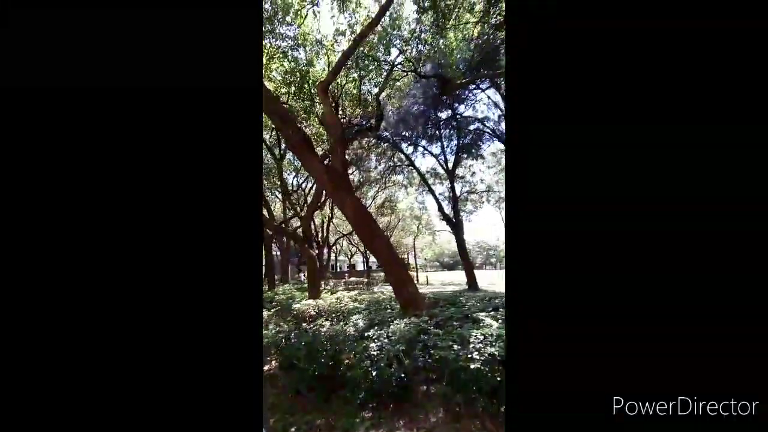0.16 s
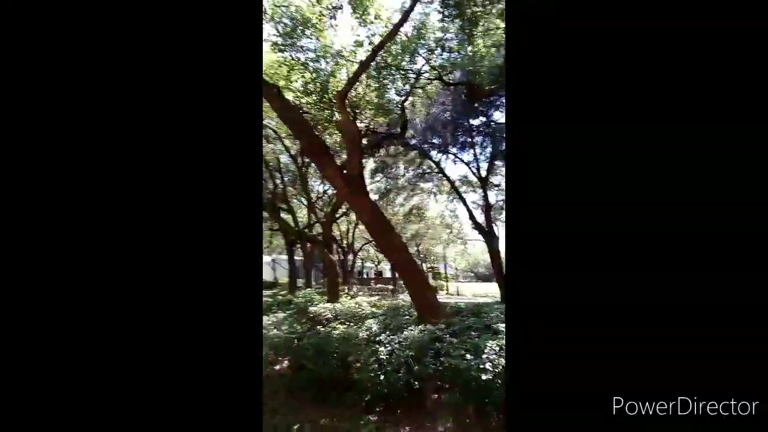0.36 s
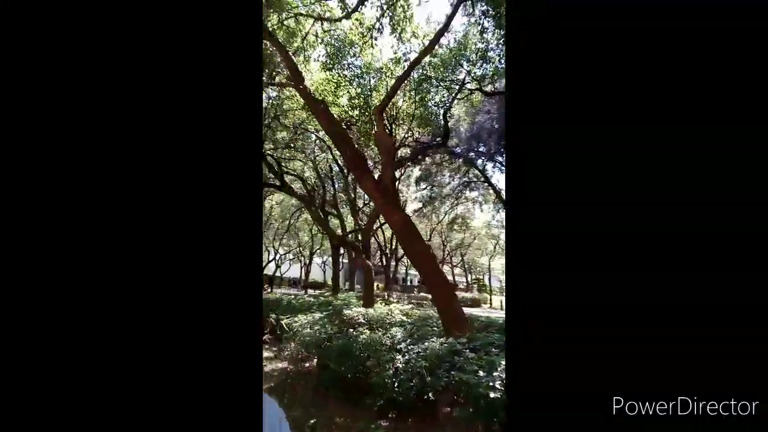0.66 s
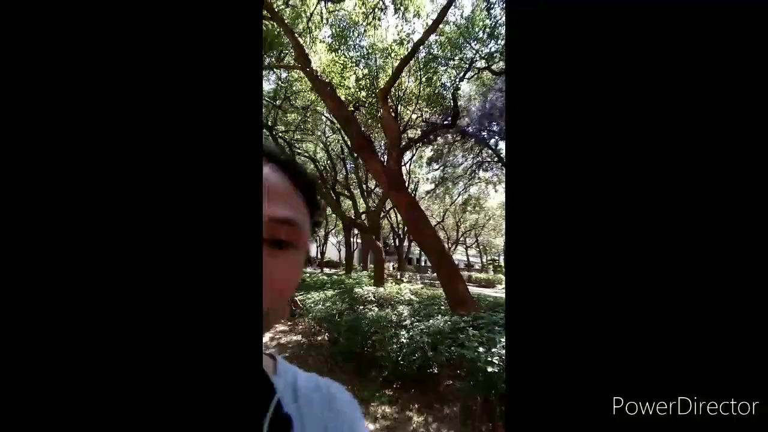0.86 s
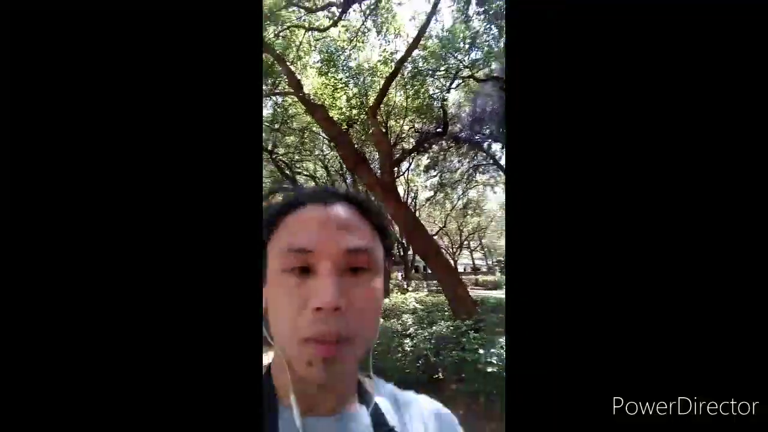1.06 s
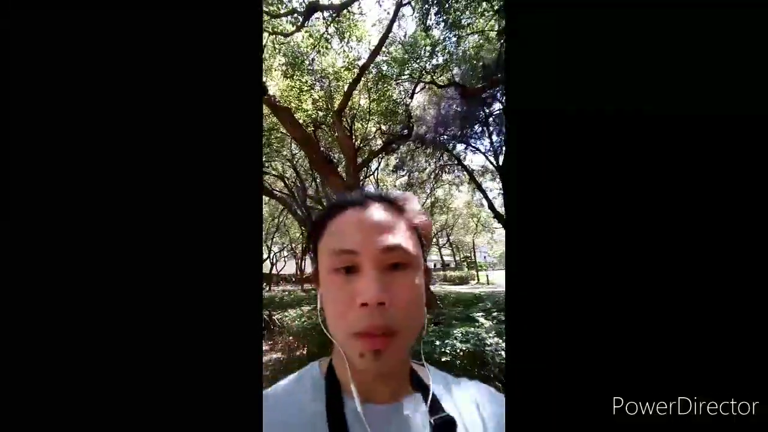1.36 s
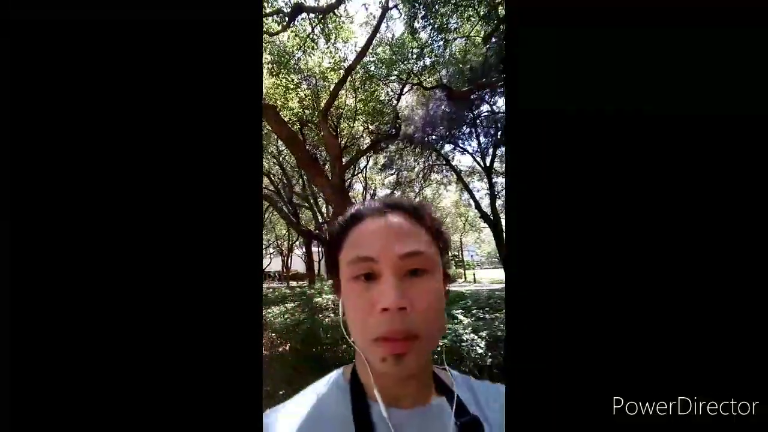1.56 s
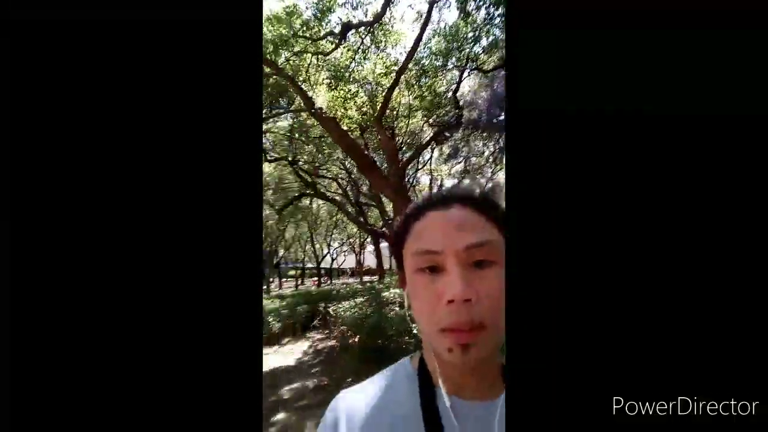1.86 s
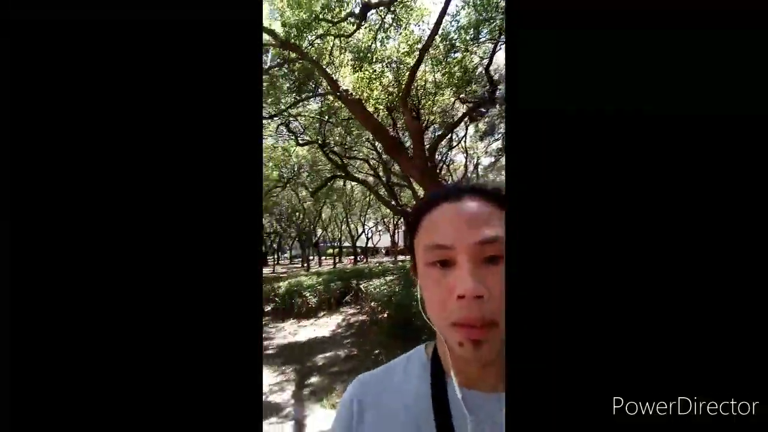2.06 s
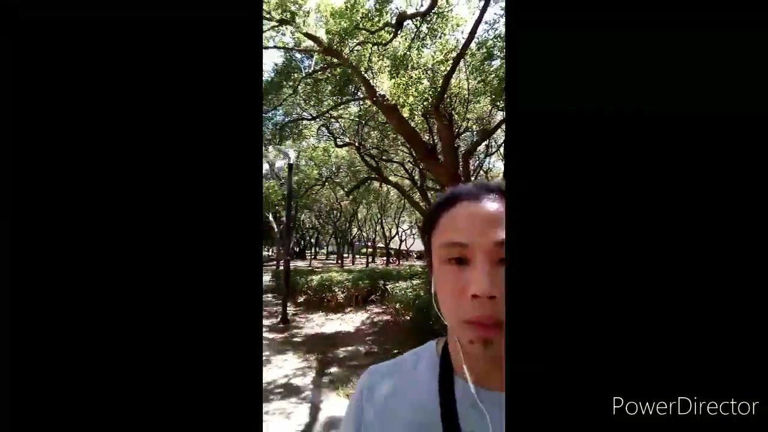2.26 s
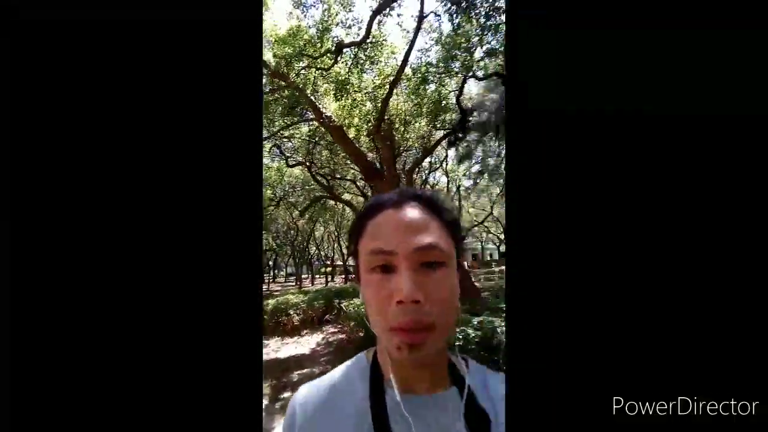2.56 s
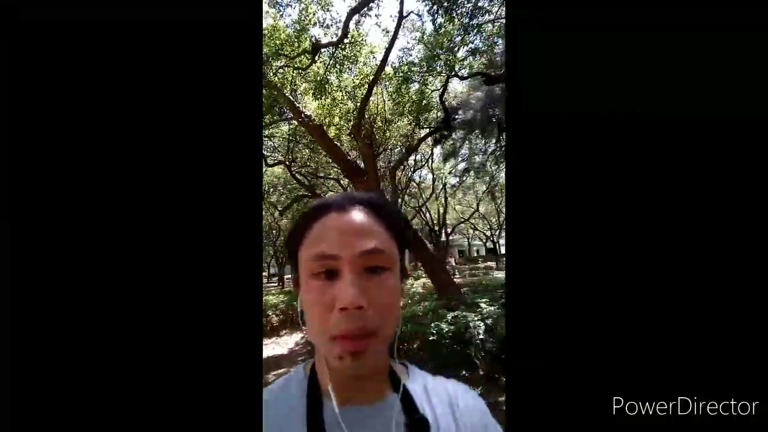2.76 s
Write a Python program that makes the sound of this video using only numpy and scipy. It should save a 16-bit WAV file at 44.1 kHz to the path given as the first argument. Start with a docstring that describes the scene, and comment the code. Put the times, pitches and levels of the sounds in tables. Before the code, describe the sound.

Cicadas drone with a high, whining sizzle among trees, growing louder around a hand-held microphone. Past the middle come a few quick, raspy bird squeaks and a soft handling bump, over faint town rumble.

```python
"""A grove, with one hand-held microphone among a chorus of cicadas. Their tymbal clicks merge into
a sizzle that swells as the microphone turns; narrow whines stand out of it and creep upward.
About two seconds in, a brief run of falling squeaks, probably a bird, echoes among the trees.
Underneath lie a distant town, a soft hiss of leaves, a faint mains hum and light handling noises."""
import sys
import numpy as np
from scipy import signal
from scipy.fft import rfft, irfft, next_fast_len
from scipy.io import wavfile
from scipy.ndimage import map_coordinates

SR = 44100
rng = np.random.default_rng(int(sys.argv[2]) if len(sys.argv) > 2 else 0)


def wav_out(sig):
    """Save sig, one row per channel (or a flat mono array), as 16-bit PCM at SR to the path in sys.argv[1]."""
    wavfile.write(sys.argv[1], SR, np.round(np.clip(np.atleast_2d(sig).T, -1, 1) * 32767).astype(np.int16))


N = 127890


def amp(db):
    """Decibels to gain."""
    return 10 ** (np.asarray(db) / 20)


def unit(x):
    """Scale to rms 1."""
    return x / np.sqrt(np.mean(x ** 2) + 1e-20)


def along(points, hz):
    """Interpolate (Hz, value) points on a log frequency axis."""
    point_hz, values = np.transpose(points)
    return np.interp(np.log(hz + 1), np.log(point_hz + 1), values)


def curve(rows):
    """(seconds, value) rows as one value per sample."""
    return np.interp(np.arange(N) / SR, *np.transpose(rows))


def wobble(rate):
    """A smooth random curve, rate knots a second."""
    knots = rng.standard_normal(int(N * rate / SR) + 4)
    return map_coordinates(knots, [np.arange(N) * rate / SR])


def filtered(x, response):
    """Filter x by a gain given as a function of Hz."""
    size = next_fast_len(N + SR // 2)
    return irfft(rfft(x, size) * response(np.fft.rfftfreq(size, 1 / SR)), size)[..., :N]


def coloured(x, spectrum):
    """x shaped by (Hz, dB) points, at rms 1."""
    return unit(filtered(x, lambda hz: amp(along(spectrum, hz))))


def arch(start, length):
    """A rounded swell from 0 to 1 and back, and the progress through it."""
    progress = np.clip((np.arange(N) / SR - start) / length, 0, 1)
    return np.sin(np.pi * progress), progress


def tone(hz):
    """A sine that follows a pitch curve."""
    return np.sin(2 * np.pi * np.cumsum(hz) / SR)


def grove(x):
    """Ever-changing scatter from trunks and swaying leaves: the echo, and its overhang past the end."""
    # The high treble dies first. Each row: frequency in Hz, seconds to fall 60 dB.
    ring_time = [(500, 0.35), (2500, 0.56), (7000, 0.39), (14000, 0.18)]
    out, piece = np.zeros(N + SR), SR // 16
    for at in range(0, N, piece):  # a fresh tail for each piece
        hz, t, noise = signal.stft(rng.standard_normal(SR // 3), SR, nperseg=256)
        decay = amp(-60 * t / along(ring_time, hz)[:, None])
        tail = signal.istft(noise * decay, SR, nperseg=256)[1]
        echo = signal.fftconvolve(x[at:at + piece], tail / np.linalg.norm(tail))
        out[at:at + len(echo)] += echo
    return out[:N], out[N:]


def tymbals(body, insects, clicks_per_s=430, wander=.015, jitter_s=.00016):
    """Each insect clicks at its own wandering rate; the trees scatter it, the resonance colours it."""
    clicks = np.zeros(N)
    for _ in range(insects):
        rate = clicks_per_s * np.exp(.2 * rng.standard_normal() + wander * wobble(12))
        cycles = np.cumsum(rate) / SR + rng.random()
        at = np.flatnonzero(np.diff(np.floor(cycles)))
        timing, strength = rng.standard_normal((2, N))[:, at]
        at = np.round(at + jitter_s * SR * timing).astype(int) % N
        clicks += np.bincount(at, amp(2 * strength), N)
    clicks = filtered(clicks, lambda hz: hz > 2800)
    echo, overhang = grove(clicks)
    already_ringing = np.pad(overhang, (0, N - SR))  # the grove is sounding from the start
    return coloured(0.51 * clicks + echo + already_ringing, body)


def whines(partials, flutter_rate, rough):
    """Narrow partials that glide up together, each fluttering in strength and phase."""
    # Each row: time in seconds, share of full pitch.
    glide = [(0, .986), (.8, .987), (1.5, .993), (2.1, .999), (2.9, 1.001)]
    phase_per_hz = 2 * np.pi * np.cumsum(curve(glide)) / SR
    out = np.zeros(N)
    for hz, db in partials:
        drift = np.exp(2j * wobble(7))
        flutter = rough * (wobble(flutter_rate) + 1j * wobble(flutter_rate))
        out += amp(db) * unit(np.real((drift + flutter) * np.exp(1j * hz * phase_per_hz)))
    return out


def cicadas():
    """Three registers of tymbal sizzle, the lower two with whines, over faint deep callers that fade."""
    # Tymbal resonances of each group. Each row: frequency in Hz, relative level in dB.
    deep_body = [(3300, -22), (3950, -2.5), (4350, -2), (4600, 2), (5000, -19)]
    low_body = [(2800, -66), (3600, -22.5), (4250, -11), (4600, -5), (5000, 0.5), (5600, 2), (5900, -1),
                (6600, -40)]
    main_body = [(4800, -50), (5700, -10.5), (6200, -2.5), (6850, 0.5), (7550, -1), (7900, -2.5),
                 (8250, -7.5), (9000, -10.5), (10000, -14), (13000, -33)]
    near_body = [(5200, -38.5), (6200, -6), (6900, -4), (7400, -0.5), (7800, -3), (8300, -10.5),
                 (9500, -21), (12000, -40)]
    high_body = [(7500, -26), (8700, -5), (9500, -5), (10100, 0), (10800, 1.5), (11300, -0.5),
                 (11800, -5.5), (12400, -11.5), (13500, -16.5), (15400, -23)]
    # Whining partials. Each row: full pitch in Hz, relative level in dB.
    low_whines = [(4432, -14), (4625, -20), (4755, -14), (4802, -10), (4915, -17), (5112, -13), (5343, -7),
                  (5520, -11)]
    main_whines = [(6003, -13.5), (6208, -16), (6442, -10.5), (6665, -19), (6945, -15), (7112, -17),
                   (7357, -15), (7705, -20), (7905, -21), (8522, -22), (8882, -20)]
    # Loudness at the microphone. Each row: time in seconds, gain in dB.
    deep_level = [(0, -55), (.5, -49), (.95, -49.5), (1.3, -59), (2.9, -66)]
    low_level = [(0, -39.6), (.52, -38.1), (.9, -38.8), (1.06, -40.6), (1.36, -40.6), (1.52, -38.6),
                 (1.86, -38.1), (2.16, -35.6), (2.46, -34.6), (2.68, -36.2), (2.77, -34.2), (2.9, -36)]
    main_level = [(0.02, -33), (0.3, -34), (0.31, -32.5), (1.29, -32), (1.52, -29.5), (1.67, -30.5),
                  (2.13, -26.5), (2.19, -29), (2.21, -26), (2.29, -27), (2.39, -25), (2.42, -27.5),
                  (2.61, -25), (2.62, -30), (2.65, -26), (2.87, -27)]
    high_level = [(0.02, -38), (0.25, -38), (0.26, -40), (0.59, -38), (0.62, -41), (0.65, -40),
                  (1.88, -32.5), (1.88, -34), (2.25, -37), (2.87, -36)]
    # The nearest insects come forward. Each row: time in seconds, share of the main sizzle's power.
    near_share = [(0, .05), (1.2, 0.12), (2.1, 0.52), (2.9, 0.56)]

    near = curve(near_share)
    sizzle = np.sqrt(1 - near) * tymbals(main_body, insects=8)
    sizzle += np.sqrt(near) * tymbals(near_body, insects=4)
    low = amp(-1.5) * tymbals(low_body, insects=6)
    low += amp(-1.46) * whines(low_whines, flutter_rate=45, rough=0.97)
    main = amp(-0.63) * sizzle + amp(-1.8) * whines(main_whines, flutter_rate=70, rough=1.1)
    high = amp(0.65) * tymbals(high_body, insects=8)
    return (low * amp(curve(low_level) + 0.19 * wobble(24.88))
            + main * amp(curve(main_level) + 0.18 * wobble(36.06))
            + tymbals(deep_body, insects=3) * amp(curve(deep_level))
            + high * amp(curve(high_level) + 0.15 * wobble(24)))


def town(db=-45):
    """The rumble of a distant town, swaying slightly in level."""
    # Each row: frequency in Hz, relative level in dB.
    rumble = [(13, -40), (22, -5), (40, -7), (120, 0), (200, -2), (280, -4), (400, -7), (520, -5.5),
              (700, -8), (1000, -12), (1450, -14.5), (2400, -17.5), (3300, -26), (4300, -33)]
    return amp(db + .6 * wobble(8)) * coloured(rng.standard_normal(N), rumble)


def leaves():
    """A soft hiss of leaves, mostly 1-4 kHz, that dies away."""
    # Each row: frequency in Hz, relative level in dB.
    hiss = [(500, -16), (1200, -2), (2500, 1), (4000, 4.5), (7000, -25)]
    # Each row: time in seconds, level in dB.
    level = [(0, -56), (.3, -48.5), (.8, -54), (1.3, -55), (2.9, -86)]
    return amp(curve(level) + wobble(13)) * coloured(rng.standard_normal(N), hiss)


def mains_hum(hz=117, db=-60.5):
    """One faint low tone with a wavering phase."""
    phase = 2 * np.pi * hz * np.arange(N) / SR + 0.64 * wobble(6)
    return amp(db) * unit(np.sin(phase))


def scuffs(spread_octaves=0.13):
    """Light rubs of handling at the microphone, each a puff of noise about one pitch."""
    # Each row: start in seconds, length in seconds, centre in Hz, level in dB.
    rubs = [(.235, .08, 1100, -53), (.865, .035, 3800, -48), (.908, .014, 15000, -48)]
    out = np.zeros(N)
    for start, length, centre, db in rubs:
        band = lambda hz: np.exp(-.5 * (np.log2((hz + 1) / centre) / spread_octaves) ** 2)
        out += amp(db) * arch(start, length)[0] * unit(filtered(rng.standard_normal(N), band))
    return out


def bird(rasp_db=-15, rasp_stretch=1.6, echo_db=-8):
    """Quick raspy slurs that drop and level off, with a thin whistle, answered by the grove."""
    # Each row: start in seconds, length in seconds, first and last pitch in Hz, level in dB.
    squeaks = [(1.85, .009, 1800, 1690, -44), (1.867, 0.0059, 1760, 1670, -38),
               (1.871, 0.0181, 3100, 2124, -33), (1.902, 0.01, 2524, 2196, -36.5),
               (1.913, 0.012, 1937, 1830, -36.5), (1.926, 0.011, 3050, 2770, -38),
               (1.929, 0.0102, 2005, 1630, -31.5), (1.997, .008, 1850, 1670, -40.5),
               (2.007, 0.014, 1800, 1750, -44)]
    # Each row: start in seconds, length in seconds, pitch in Hz, level in dB.
    whistles = [(1.912, .036, 3800, -38), (1.94, .12, 3830, -48)]
    # Colour of the rasp. Each row: frequency in Hz, relative level in dB.
    rasp_body = [(900, -30), (1600, -8), (2400, -2), (3200, 6), (4200, -12), (6000, -40)]
    call = np.zeros(N)
    rasp = amp(rasp_db) * coloured(rng.standard_normal(N), rasp_body)
    for start, length, start_hz, end_hz, db in squeaks:
        swell, progress = arch(start, length)
        pitch = end_hz + (start_hz - end_hz) * (1 - progress) ** 2.2
        slur = swell * tone(pitch * (1 + 0.0245 * wobble(900)))
        call += amp(db) * (slur + arch(start, rasp_stretch * length)[0] * rasp)
    for start, length, hz, db in whistles:
        call += amp(db) * arch(start, length)[0] * tone(hz * (1 + .018 * wobble(500)))
    return call + amp(echo_db) * grove(call)[0]


def hand_bump(start_s=2.205, length_s=.17, db=-43.5):
    """The hand bumps the microphone: one soft, low thud."""
    # Each row: frequency in Hz, relative level in dB.
    thud = [(25, -22), (55, -4), (82, 0), (125, -7), (280, -42)]
    return amp(db) * arch(start_s, length_s)[0] * coloured(rng.standard_normal(N), thud)


def scene():
    """One microphone feeds both channels."""
    mono = cicadas() + town() + leaves() + mains_hum() + scuffs() + bird() + hand_bump()
    return np.tile(mono, (2, 1))


def record(dry):
    """The phone keeps nothing above its band limit."""
    return filtered(dry, lambda hz: hz < 15450)


dry = scene()
out = record(dry)
wav_out(out)
```